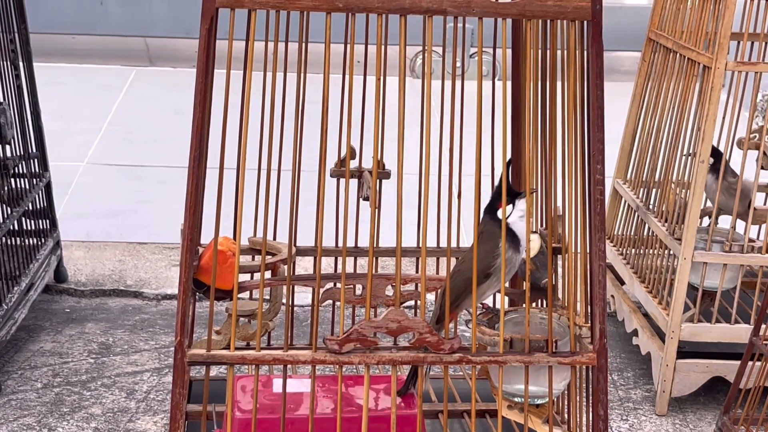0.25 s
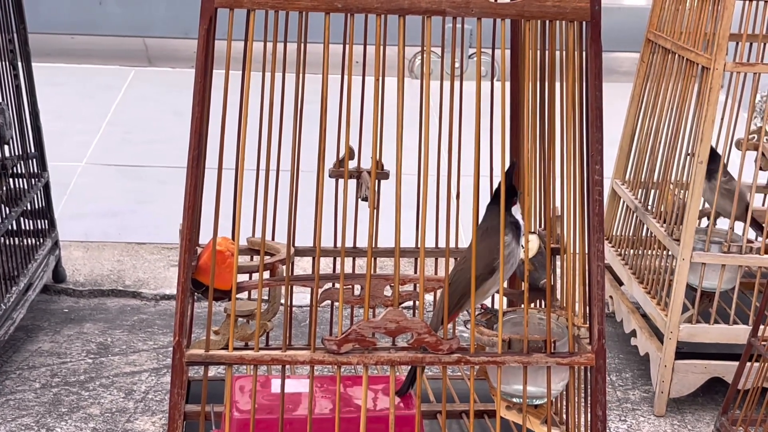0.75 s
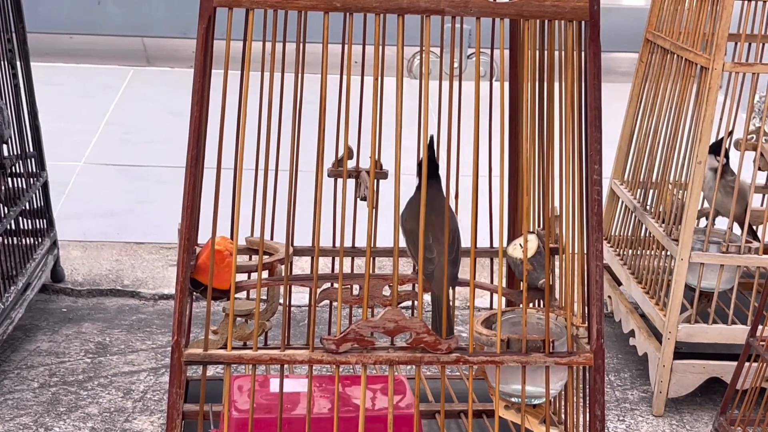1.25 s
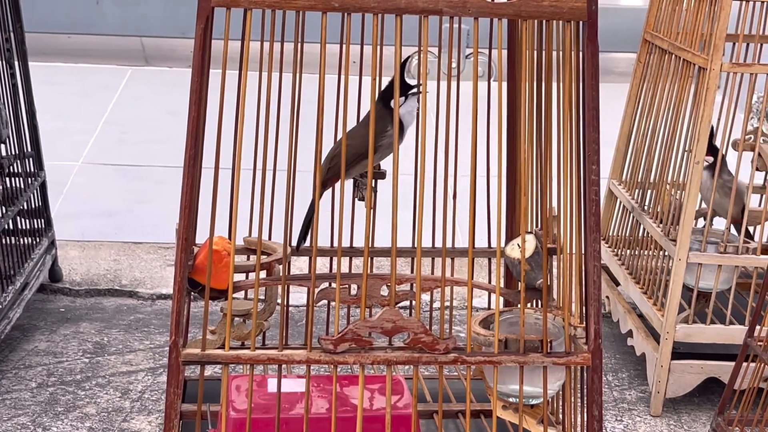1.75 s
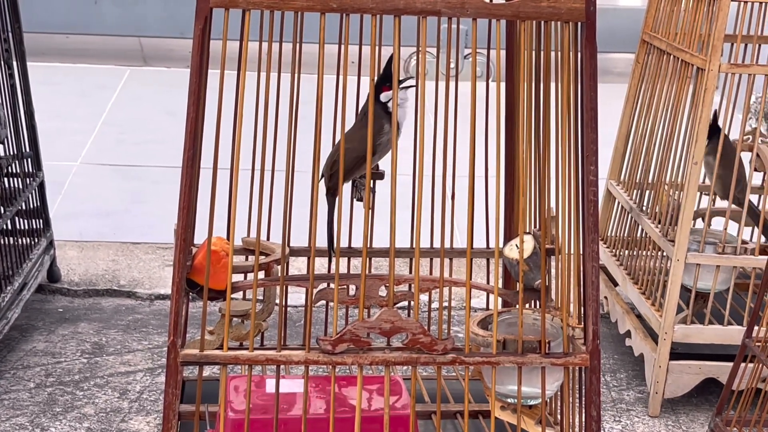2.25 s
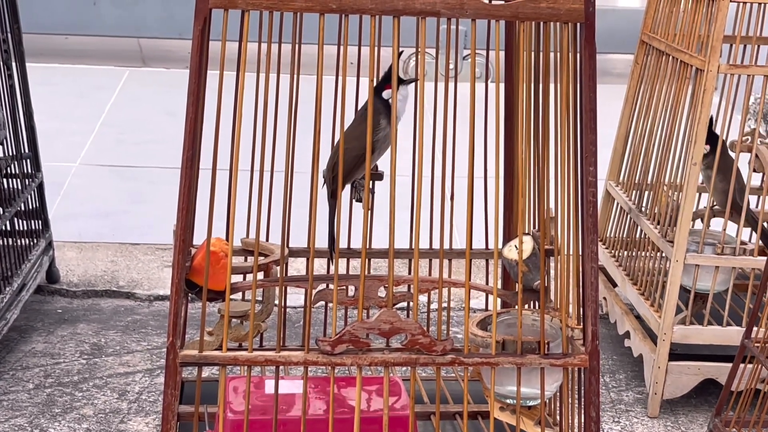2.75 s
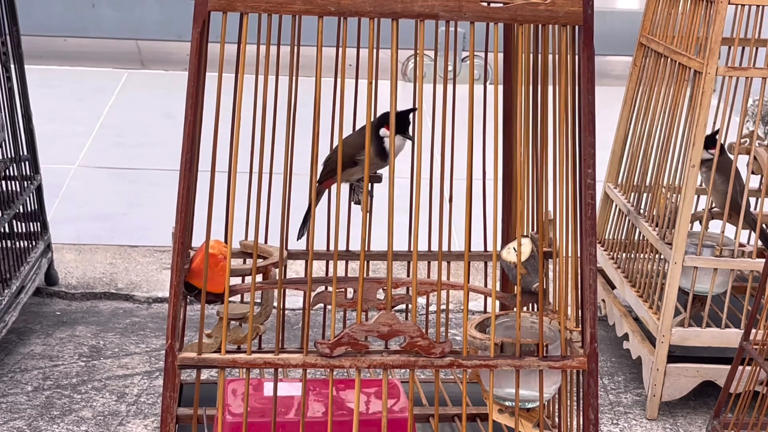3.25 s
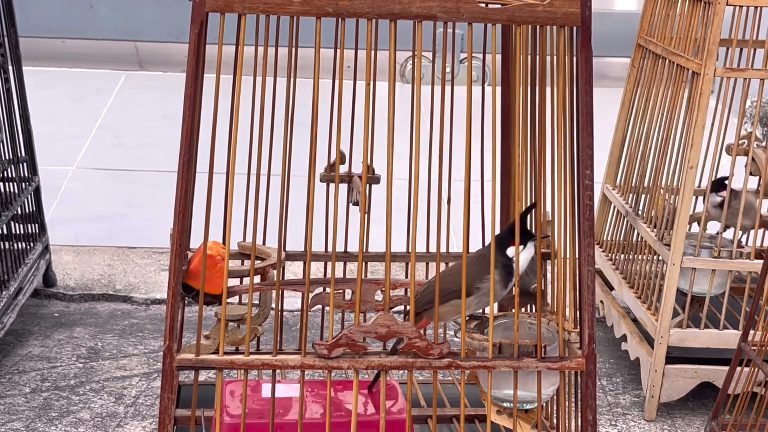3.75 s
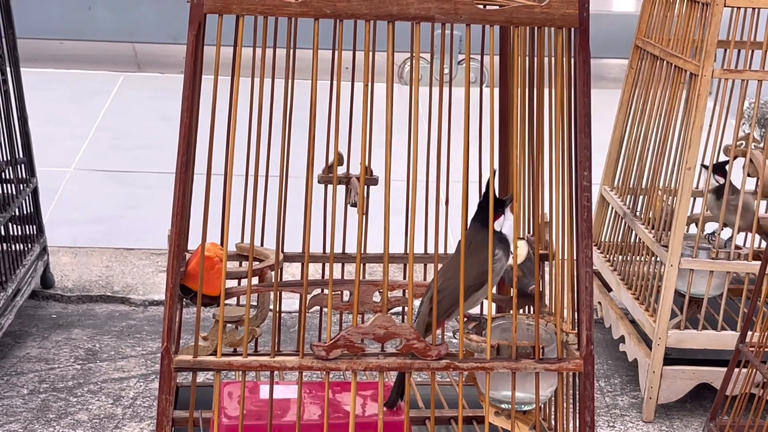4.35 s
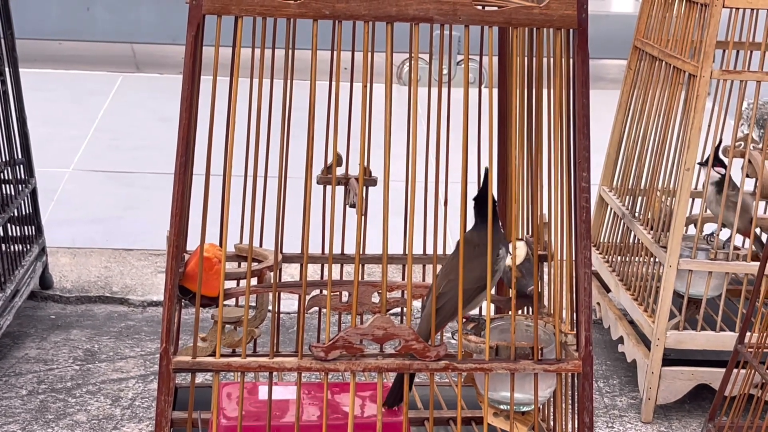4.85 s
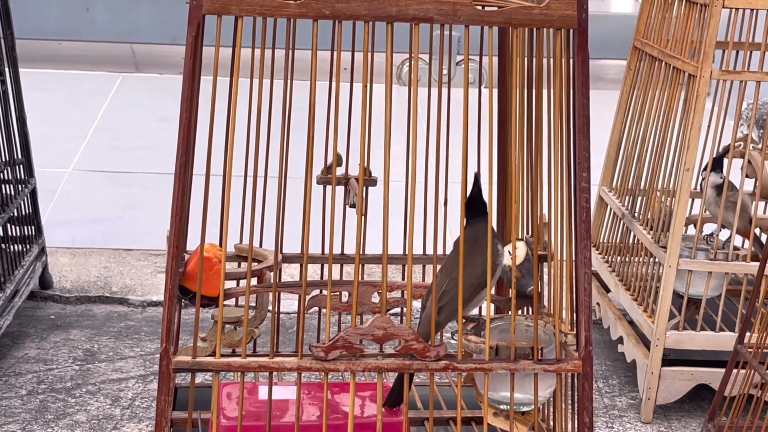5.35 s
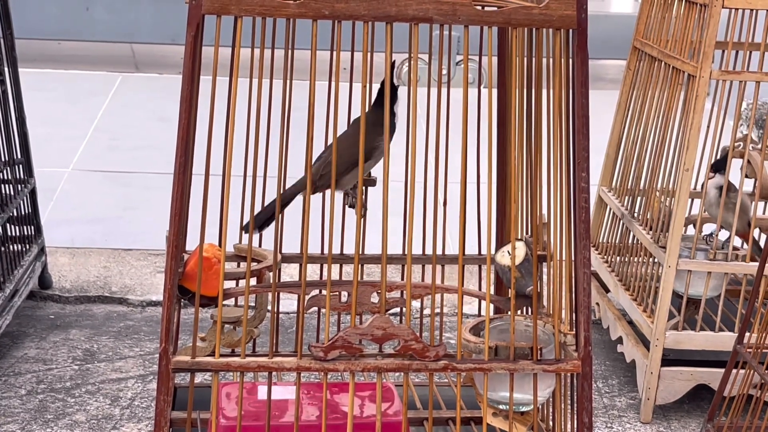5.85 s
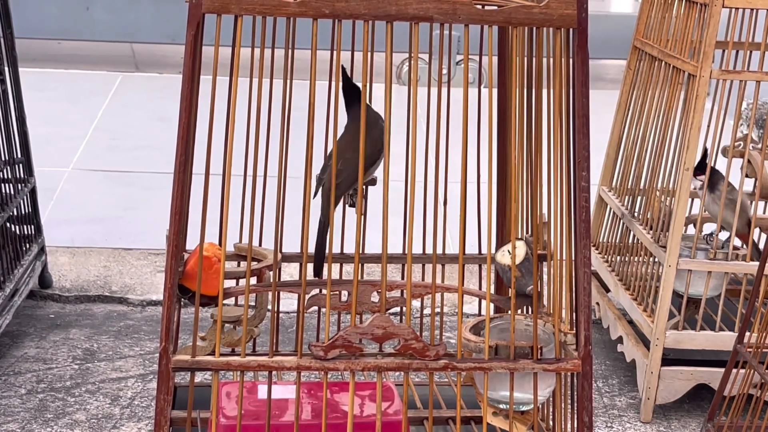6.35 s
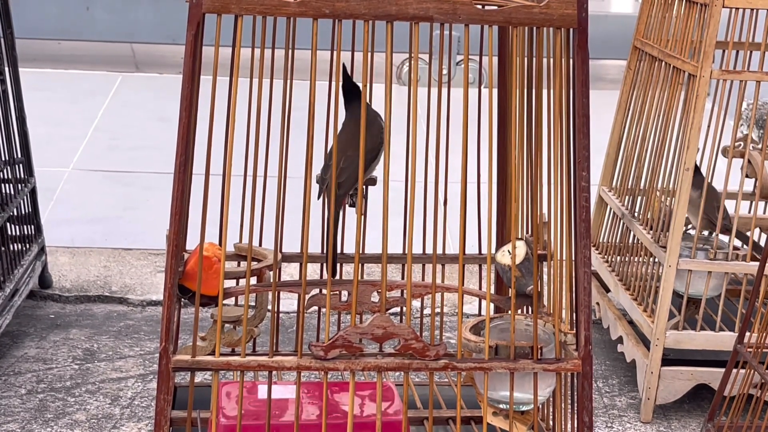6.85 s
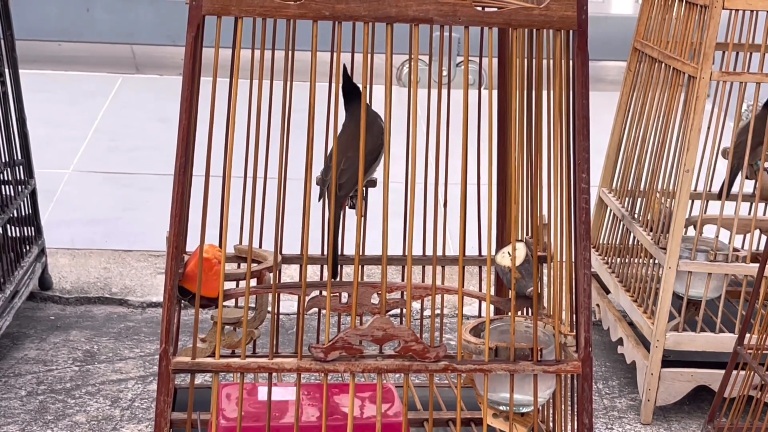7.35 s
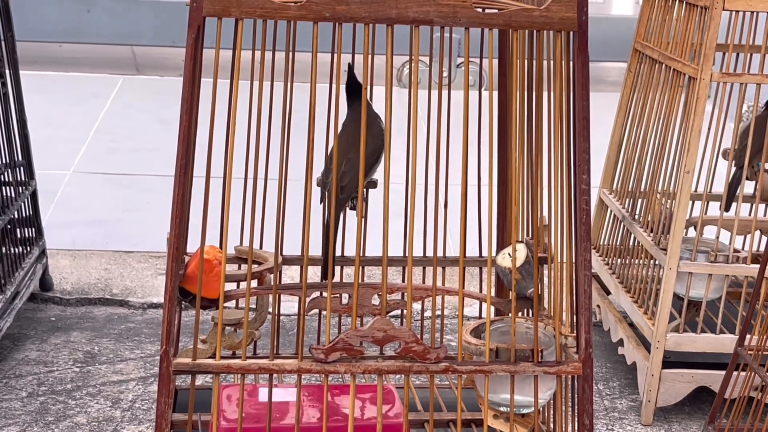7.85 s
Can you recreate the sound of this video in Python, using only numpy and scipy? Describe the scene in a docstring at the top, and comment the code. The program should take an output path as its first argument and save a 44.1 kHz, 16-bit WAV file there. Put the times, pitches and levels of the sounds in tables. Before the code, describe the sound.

Close, clear warbling from a caged songbird gives way to quiet calls and faraway birds, over light wind and handling thumps.

```python
"""A caged bulbul, close by in a paved yard, strings stock syllables into four loud, trilled phrases.
Its syrinx gives a nearly pure tone, the beak beams the overtones; soft nasal chups fall in between.
Other birds twitter or answer from farther off; the cages tick, rustle and once ring.
Wind buffets the microphone at first; later the hand-held camera thumps and rubs over a faint hush."""
import sys
import numpy as np
from scipy import signal
from scipy.fft import rfft, irfft, next_fast_len
from scipy.io import wavfile
from scipy.ndimage import map_coordinates

SR = 44100
rng = np.random.default_rng(int(sys.argv[2]) if len(sys.argv) > 2 else 0)


def transcribe(signal):
    """Save signal, clipped to [-1, 1], as a 16-bit WAV file at the path in sys.argv[1]."""
    frames = np.atleast_2d(signal).T
    limited = np.clip(frames, -1, 1)
    pcm = np.round(limited * 32767).astype(np.int16)
    wavfile.write(sys.argv[1], SR, pcm)


N = 357651
TOP_HZ = 15800

# syllable shapes: t/s, f/Hz, level/dB, trill depth/share of f
BUZZ = [(0, 1519, -39.5, .12), (0.011, 2072, -27, 0.19), (.023, 2423, -16.5, .08),
        (.042, 2535, -14.5, 0.078), (0.064, 2770, -15, 0.19), (0.078, 3288, -18.5, 0.23),
        (.094, 3800, -16, .14), (.112, 3861, -13.5, .12), (.122, 3850, -36, .1)]  # climbs an octave
WARBLE = [(0, 2156, -36, 0.088), (.013, 2052, -25.5, .06), (.026, 1919, -15.5, 0.089),
          (.038, 1958, -19.5, .05), (.044, 2484, -9, 0.092), (.057, 2590, -7.5, .13),
          (.073, 2900, -8.5, .1), (.092, 3049, -7.5, 0.067), (.106, 2993, -36, 0.034)]  # soft low note, then a loud step up
SWEEP = [(0, 1105, -37.5, 0.035), (.012, 2212, -28, .03), (0.02, 2277, -22, 0), (.022, 2810, -10.5, 0.066),
         (0.03, 3412, -26.5, 0.0603), (.044, 3517, -12, .04), (.052, 3570, -14, .01), (0.056, 3733, -18, 0),
         (.064, 3880, -34.5, .02)]  # fast rise, broken halfway
DROP = [(0, 3993, -28.5, 0.0079), (.006, 2634, -20.5, 0.0027), (0.016, 2593, -9, 0.015),
        (.022, 2948, -10, 0.0034), (.028, 2558, -6, 0.017), (.05, 2537, -11, 0.034), (.07, 2600, -11, .06),
        (.078, 2253, -16, 0.02), (.093, 2242, -19, 0)]  # falls onto a held note, sags
TRILL = [(0, 4090, -31, 0), (.006, 2974, -11.5, 0.024), (0.011, 3424, -13, .09), (0.03, 3720, -10.5, .09),
         (0.048, 3847, -9, .05), (.053, 3320, -19, 0), (.062, 1238, -35, 0.034)]  # high, level
SLUR = [(0, 1090, -36.5, 0), (.009, 2010, -19, .03), (.015, 2000, -18.5, .1), (.021, 2387, -8, .02),
        (.036, 2285, -6, .02), (.047, 2250, -32.5, 0)]  # up from the bottom of the voice
FLICK = [(0, 4060, -26, 0.0048), (.004, 2790, -2, 0), (.007, 3400, -11, 0), (0.009, 3580, -48.5, 0)]  # down and up
QUAVER = [(0, 2780, -38.5, .02), (.006, 2720, -9, .015), (.021, 2550, -10.5, 0), (.027, 2600, -8, 0.017),
          (.05, 2671, -8.5, .08), (.06, 2312, -9, 0), (.07, 2270, -7.5, 0.02), (.076, 2250, -31, 0.0028)]  # held, quavers, sags
FLOURISH = [(0, 3300, -37, 0), (.006, 2600, -21, .03), (0.021, 2700, -7.5, .03), (0.028, 2440, -11.5, 0),
            (.046, 2423, -8.5, 0.039), (.058, 2500, -22.5, .1), (.078, 2880, -15, .2),
            (.11, 3830, -20, 0.18), (0.128, 3950, -32.5, 0.12)]  # held, then a climbing buzz
# other side of the syrinx, same columns
LOW_RISE = [(0, 1292, -26, 0.0046), (.008, 1667, -25, 0.025), (.022, 2300, -23, .03), (.03, 2493, -24, 0)]
LOW_FALL = [(0, 2450, -44.5, 0.0029), (.026, 2245, -25, .02), (.046, 2040, -23, .02)]
LOW_END = [(0, 1750, -36, 0), (.008, 1520, -23, .02), (.024, 1725, -24.5, 0.017), (.066, 1765, -24, .01),
           (.096, 1677, -34.5, .01)]  # closes each phrase


def bulbul(hiss_db=-38, splash_db=-17, hiss_beam=0.88):
    """Syllables in a row; thin hiss near 11-12 kHz follows their level, hard trills splash noise."""
    # t/s, shape, level/dB, pitch ratio, length ratio, trill rate/Hz, treble/dB as the head turns
    phrases = [(-.097, WARBLE, -4.5, 1.02, 1.071, 69, -1.5), (0.063, TRILL, -0.5, 1, 1, 66.7, 17.5),
               (.163, SLUR, 1, 1, 1, 79.4, 2), (.213, FLICK, -1.5, 1, 1, 80, 1.5),
               (0.23, QUAVER, -0.5, 1.022, 0.97, 76.1, -6), (.302, LOW_END, 2.5, 1.07, 0.4, 78.3, -2),
               (1.192, BUZZ, -1, 1.037, 1.044, 97.8, -3), (1.487, WARBLE, -1.5, 1.057, 1.06, 68.64, -3),
               (1.649, SWEEP, 5.5, 1.037, 1.0, 80.03, -3.5), (1.793, FLOURISH, 0.5, 1, 1, 89.5, -4.5),
               (1.81, LOW_RISE, -6, 0.95, 1.12, 80.3, -2.5), (1.84, LOW_FALL, 0, 1.02, 1.03, 80, -0.5),
               (1.884, LOW_END, -1.5, 1.046, 0.96, 80.3, 6), (2.046, WARBLE, -1, 1.002, .99, 69.6, 7.5),
               (2.198, SWEEP, 2, 1.011, 1.036, 82.1, 7.5), (2.317, DROP, -1, 1, 1, 75.1, -5.5),
               (2.406, LOW_END, -0.5, 0.99, 0.92, 80, 3), (4.198, BUZZ, 1, .99, .93, 96.03, -3.5),
               (4.255, LOW_FALL, -21, .6, 1, 80, -2), (4.445, WARBLE, 1, 1, 0.95, 69.46, -3),
               (4.598, SWEEP, -0.5, 0.99, 0.94, 81.6, 2.5), (4.716, DROP, 1, 1.012, 0.92, 74.9, -6),
               (4.803, LOW_END, -.5, 1, 1.02, 81.55, -8.5)]
    # noise spectra: f/Hz, level/dB
    hiss_spectrum = [(3500, -48), (5500, -16), (9000, -15.5), (10200, -33), (11000, -7), (12000, -1.5),
                     (12800, -32), (15500, -34.5)]
    splash_spectrum = [(900, -30.5), (1600, -7.5), (3500, -9), (5000, -6.5), (9500, -6.5), (10300, -19.5),
                       (11400, -11.5), (12800, -34.5)]
    tone, hiss_level, splash = np.zeros((3, N))
    for s, shape, db, pitch_ratio, length_ratio, trill_hz, treble_db in phrases:
        sound, level, depth = syllable(shape, pitch_ratio, length_ratio, trill_hz, treble_db)
        hiss_envelope = (amp(db) * level) ** .7
        add(tone, s, amp(db) * sound)
        add(hiss_level, s, amp(hiss_db + hiss_beam * treble_db) * hiss_envelope)
        add(splash, s, amp(splash_db + db) * depth * level)
    return tone + hiss_level * hiss(hiss_spectrum) + splash * hiss(splash_spectrum)


def syllable(shape, pitch_ratio, length_ratio, trill_hz, treble_db, settle_s=.04, edge_s=0.0015):
    """Tone, level and trill depth; each trill beat leaps up pinched and slides down strong."""
    knots_s, *columns = np.transpose(shape)
    n = int(knots_s.max() * length_ratio * SR)
    t = np.arange(n) / SR
    contour_hz, level_db, depth = (np.interp(t, knots_s * length_ratio, c) for c in columns)
    fast_start = 1 + .8 * np.exp(-t / settle_s)
    beat = phase_of(trill_hz * fast_start * (1 + .025 * wobble(90, n)))
    leap = .8 * np.sin(beat) + .25 * np.sin(2 * beat)
    jitter = (0.0029 + .16 * depth) * wobble(500, n)
    pitch_hz = pitch_ratio * contour_hz * (1 + depth * leap + jitter)
    pulse_db = -46 * depth * (np.cos(beat) + 0.37) + .8 * wobble(150, n)
    membrane_flutter = np.sin(phase_of(310 * (1 + .15 * wobble(90, n))))
    burr = 1 + np.clip(4.5 * depth, 0, .3) * membrane_flutter
    gate = np.clip(np.minimum(t, t[-1] - t) / edge_s, 0, 1)  # syrinx opens and shuts
    level = amp(level_db + pulse_db) * gate
    return level * burr * syrinx(pitch_hz, treble_db), level, depth


def syrinx(pitch_hz, beam_db, full_beam_hz=11000, unsteady_db=4):
    """Nearly pure tone with faint, unsteady overtones; the beak beams the highest most."""
    overtones = [(3000, -26.5), (4800, -38), (6500, -41), (8200, -34), (10200, -35), (11100, -17.5),
                 (12000, -34.5), (12800, -58), (15500, -57.5)]  # f/Hz, level/dB re fundamental
    phase = phase_of(pitch_hz)
    tone = np.sin(phase)
    for k in range(2, 7):
        hz = k * pitch_hz
        beamed_db = beam_db * np.minimum(hz / full_beam_hz, 1) ** 2
        db = along(overtones, hz) + beamed_db + unsteady_db * wobble(140, len(hz))
        tone += amp(db) * (hz < TOP_HZ) * np.sin(k * phase)
    return np.sqrt(2) * tone


def chups(arch_depth=0.28, hoarse_db=-9, shake=0.049):
    """Short nasal calls: an arch of pitch, rich in overtones, broken up and a little hoarse."""
    calls = [(0.4625, -31, 0.024, 1480), (0.6157, -41, 0.04, 1375), (0.727, -39.5, 0.044, 1217),
             (0.81, -40, 0.042, 1258), (1.154, -36, 0.068, 1457), (1.3913, -34, 0.05, 1326),
             (1.461, -25.5, 0.046, 1411), (2.6065, -33.5, 0.07, 1378), (2.895, -36.5, 0.056, 1706),
             (3.009, -38, 0.068, 1313), (3.166, -36, 0.029, 1636), (3.393, -34.5, 0.042, 1550),
             (3.5547, -24, 0.043, 1429), (3.76, -36, 0.027, 1606), (3.88, -35, 0.052, 1592),
             (6.035, -39.5, 0.046, 1497), (6.1356, -27.5, 0.035, 1405), (6.2353, -35, 0.065, 1685),
             (6.405, -39, 0.032, 1460), (6.596, -39.5, 0.065, 1587), (7.2405, -45, 0.038, 1564),
             (7.3644, -47.5, 0.067, 1450), (7.7303, -33.5, 0.056, 1718), (8.0835, -29, 0.046, 1492)]  # t/s, level/dB, length/s, mean f/Hz
    spectrum = [(1000, 0.5), (1600, 3.5), (3200, 2), (4800, -10), (7000, -18.5), (10000, -20), (11500, -23),
                (13500, -38.5)]  # f/Hz, level/dB
    out = np.zeros(N)
    rasp = amp(hoarse_db) * hiss([(500, -42.5)] + list(spectrum))
    for s, db, length_s, mean_hz in calls:
        u = np.linspace(0, 1, int(length_s * SR))
        span = (int(s * SR) + np.arange(len(u))) % N
        arch = np.sin(np.pi * u)
        hz = mean_hz * (1 + arch_depth * (arch - 2 / np.pi) + shake * wobble(330, len(u)))
        voice = sum(amp(along(spectrum, k * hz)) * np.sin(k * phase_of(hz)) for k in range(1, 9))
        level = amp(db - 11.5 + 4 * wobble(211, len(u))) * arch
        add(out, s, level * (voice + rasp[span]))
    return out


def twitter():
    """A neighbouring bird's quick run of notes."""
    notes = [(.925, 0.011, 1890, 2600, -34.5, 0.022), (.942, 0.013, 1840, 2610, -31, 0.097),
             (.959, 0.015, 1830, 2540, -32.5, 0.031), (.976, 0.019, 1810, 2530, -31, 0.084),
             (.99, 0.049, 2154, 1793, -36, 0.13), (1.032, 0.026, 3110, 3820, -45, 0.095)]  # t/s, length/s, start f/Hz, end f/Hz, level/dB, trill depth
    return glides(notes)


def far_birds():
    """One bird repeats a three-note phrase; others throw in single notes, and one falling whistle near 2.47 s
    carries a strong overtone an octave up."""
    # t/s, length/s, start f/Hz, end f/Hz, level/dB, trill depth
    phrase = [(0, .055, 2070, 2110, -55.5, 0.0091), (0.04, .07, 3310, 3557, -51, .09),
              (0.164, .05, 3103, 3056, -44, .008)]
    single_notes = [(2.473, 0.088, 3230, 2655, -44.5, 0.02), (2.44, .13, 6900, 5380, -52, 0.015),
                    (3.184, 0.078, 3330, 3510, -45, 0.062), (3.309, 0.075, 2310, 2436, -49, 0.036),
                    (3.42, 0.042, 2547, 2497, -42.5, 0.017), (3.61, 0.056, 3130, 3080, -46.5, 0.072),
                    (4.13, 0.082, 2640, 2670, -53, .063), (5.841, .094, 3580, 3330, -51, 0.078),
                    (6.06, 0.096, 2580, 2550, -51.5, 0.051), (7.62, 0.091, 2910, 3090, -48, 0.086),
                    (7.669, 0.078, 3940, 3850, -51, 0.0075)]
    repeats = [(2.83, 3), (3.849, 0.5), (4.965, 0.5), (7.89, 3.5)]  # t/s, level/dB
    repeated = [(s + after_s, length_s, start_hz, end_hz, db + note_db, depth)
                for s, db in repeats for after_s, length_s, start_hz, end_hz, note_db, depth in phrase]
    return glides(repeated + single_notes)


def glides(notes, trill_hz=100):
    """Short gliding whistles, some trilled."""
    out, waver = np.zeros(N), wobble(270)
    for s, length_s, start_hz, end_hz, db, depth in notes:
        u = np.linspace(0, 1, int(length_s * SR))
        drift = waver[(int(s * SR) + np.arange(len(u))) % N]
        trill = depth * np.sin(phase_of(trill_hz * (1 + .3 * drift)))
        glide_hz = start_hz + (end_hz - start_hz) * u
        phase = phase_of(glide_hz * (1 + trill + (0.0025 + 0.3 * depth) * drift))
        tone = np.sin(phase) + amp(-25) * np.sin(2 * phase)
        add(out, s, amp(db + 3.5) * np.sin(np.pi * u) * tone)
    return out


def cage_ticks(crack_t60_s=0.017):
    """Claws and beaks on the cages: a tiny crack and one thin ring per touch."""
    touches = [(0.7523, -34, 5720, 0.082), (3.027, -29.5, 4710, 0.0088), (3.6717, -33.5, 12240, 0.037),
               (3.674, -42.5, 7800, 0.083), (5.3288, -41.5, 6670, 0.018), (5.681, -43, 6170, 0.037),
               (6.325, -48.5, 9080, 0.052), (6.7481, -35.5, 4140, 0.085)]  # t/s, level/dB, f/Hz, t60/s
    response = [(1500, -26.5), (4500, -4.5), (12000, 15.0), (13500, -40.5)]  # f/Hz, gain/dB
    out, t = np.zeros(N), np.arange(SR // 4) / SR
    for s, db, hz, t60_s in touches:
        crack = 0.19 * rng.standard_normal(len(t)) * amp(-60 * t / crack_t60_s)
        ring = 0.55 * np.sin(2 * np.pi * hz * t) * amp(-60 * t / t60_s)
        add(out, s, amp(db) * (crack + ring))
    return shaped(out, response)


def cage_ring(hop_s=3.5, gain_db=11, t60_s=1.6):
    """The cage's metal fittings ring as the bird hops down."""
    modes = [(4398, -73), (4554, -73), (5523, -73.5)]  # f/Hz, level/dB
    out, t = np.zeros(N), np.arange(SR) / SR
    ring = sum(amp(db) * np.sin(2 * np.pi * hz * t + .8 * wobble(40, SR)) for hz, db in modes)
    add(out, hop_s, ring * amp(gain_db - 60 * t / t60_s))
    return out


def handling(rise_s=0.0035, rest_db=-59, tap_hz=342, tap_count=170):
    """Dull bumps, small taps and the lumpy rub of fingers on the camera, deep bass removed; the bump at 3.48 s
    is the bird landing in its cage."""
    thumps = [(2.282, -24, 226.6), (2.303, -26, 313), (3.059, -31, 186), (3.222, -28.5, 252),
              (3.484, -30, 355), (3.511, -27.5, 494), (3.554, -29, 543.6), (3.916, -32.5, 293),
              (4.146, -26.5, 314), (4.344, -23, 400), (4.497, -23.5, 277.6), (4.964, -29, 226),
              (4.997, -31.5, 346), (5.09, -21, 230.1), (5.25, -28.5, 334), (6.075, -29, 210.6),
              (6.229, -32.5, 264), (6.678, -27.5, 191.6), (6.933, -27, 262), (6.97, -30.5, 440),
              (7.029, -34.5, 425), (7.19, -34, 444), (7.757, -26, 388)]  # t/s, level/dB, f/Hz
    finger_shifts = [(2.3, .08, -43), (3.25, .18, -49), (3.5, 0.095, -35.5), (4.28, .09, -37.5),
                     (4.56, 0.074, -47.5), (5.02, 0.037, -38.5), (5.23, 0.13, -44.5), (6.15, 0.15, -54),
                     (6.72, 0.113, -49), (6.98, .07, -37.5), (7.28, 0.0443, -58.5), (7.77, 0.038, -39),
                     (7.89, 0.029, -44.5), (8.1, 0.12, -42.5)]  # t/s, half length/s, level/dB
    rub_spectrum = [(47, -70), (80, -41.5), (122, -18), (173, 2), (270, 4), (359, 2.5), (642, -12),
                    (836, -19.5), (1000, -25.5), (1300, -61), (2200, -120)]  # f/Hz, level/dB
    low_cut = [(60, -49), (110, -13.5), (170, -0.5), (600, 2.5), (1100, 4.5)]  # f/Hz, gain/dB
    bumps, t = np.zeros(N), np.arange(SR // 10) / SR
    grip = amp(rest_db) + swells(finger_shifts)
    push = (t / rise_s) ** 2 * np.exp(2 - 2 * t / rise_s)
    for s, db, hz in thumps:
        add(bumps, s, amp(db) * push * np.sin(2 * np.pi * hz * t))
    for at, (size, detune) in zip(rng.integers(0, N, tap_count), rng.standard_normal((tap_count, 2))):
        tap = push * np.sin(2 * np.pi * tap_hz * np.exp(.3 * detune) * t)
        add(bumps, at / SR, grip[at] * amp(-0.5 + 3 * size) * tap)
    rub = amp(-2) * grip * unit(stereo_noise(rub_spectrum) * amp(4 * wobble(45)))
    return shaped(bumps + rub, low_cut)


def wind(rumble_db=-40, rumble_cut_s=1.9, fade_s=0.19, flutter_db=-1.5):
    """Low wind rumble and gusts at the microphone, cut off near 1.9 s; a few puffs follow."""
    gusts = [(1.345, .016, -25), (1.412, .032, -16), (1.57, .03, -34), (1.73, .08, -28),
             (2.21, .033, -40.5), (3.51, .045, -61), (4.5, .012, -59), (5.036, .019, -38)]  # t/s, half length/s, level/dB
    spectrum = [(13, -50.5), (22, -22.5), (44, -6), (66, -1), (134, -7), (207, -18), (240, -17.5),
                (365, -26), (516, -45.5), (700, -38.5), (910, -70.5), (1540, -120)]  # f/Hz, level/dB
    fade = np.clip((rumble_cut_s - np.arange(N) / SR) / fade_s, 0, 1)
    rumble = fade * amp(rumble_db + flutter_db * wobble(34))
    return (rumble + swells(gusts)) * stereo_noise(spectrum)


def rustling():
    """Soft swells of noise among the cages."""
    rustles = [(2.65, 0.038, -41), (4.392, .012, -42), (3.75, 0.39, -55.5), (7.95, 0.32, -59.5)]  # t/s, half length/s, level/dB
    spectrum = [(1000, -28), (2500, 1), (6000, -7.5), (9500, -6), (10200, -27), (11400, 0.5),
                (13000, -29.5)]  # f/Hz, level/dB
    return swells(rustles) * stereo_noise(spectrum)


def hush(low_cut_hz=150):
    """Faint, nearly steady outdoor noise."""
    spectrum = [(65, -36.5), (110, -6), (229, -0.5), (279, -3), (441, -5.5), (937, -8.5), (1370, -13),
                (1480, -13.5), (2110, -15), (2290, -12), (2580, -18.5), (8650, -23.5), (10100, -30.5),
                (11200, -21.5), (12600, -36), (16400, -59.5), (22000, -120)]  # f/Hz, level/dB
    level = amp(-51.5 + 0.48 * wobble(2.2))
    return level * filtered(stereo_noise(spectrum), lambda hz: 1 - 1 / (1 + (hz / low_cut_hz) ** 6))


def nearby(x):
    """Direct sound and first reflections, slightly out of step at the two microphone ports."""
    walls = [(.0027, -20.5), (.0062, -11), (0.0145, -15.5), (.047, -25), (.068, -35)]  # ground, house front, far walls: delay/s, level/dB
    left_lead = [(0, 0), (1210, 0.5), (1810, 0.27), (3010, 0.63), (4050, 0.5), (4650, 0.5), (7150, -2.5),
                 (8010, 1.16), (8870, -0.56), (9390, -1), (10300, -3.5), (11800, -5.5), (12300, -6)]  # f/Hz, phase/rad
    bounces = lambda hz: 1 + sum(amp(db) * np.exp(-2j * np.pi * hz * delay_s) for delay_s, db in walls)
    ports = lambda hz: np.exp(.5j * along(left_lead, hz) * np.array([[1], [-1]]))
    return filtered(x, lambda hz: bounces(hz) * ports(hz))


def yard_echo(x, build_s=0.036):
    """Diffuse echo; the treble dies first."""
    decay_times = [(300, 0.95), (2000, 0.75), (3500, 0.68), (6000, .45), (12000, 0.12)]  # f/Hz, t60/s
    hz, t, noise = signal.stft(rng.standard_normal((2, SR)), SR, nperseg=256)
    envelope = amp(-60 * t / along(decay_times, hz)[:, None]) * (1 - np.exp(-t / build_s))
    mid, side = signal.istft(noise * envelope, SR, nperseg=256)[1]
    tail = np.array([mid + .35 * side, mid - .35 * side])
    return signal.fftconvolve(x[None], tail / np.linalg.norm(tail[0]), axes=1)[:, :N]


def stereo_noise(spectrum):
    """Noise of rms 1, nearly mono in the bass."""
    coherence = [(100, 0.96), (250, .85), (600, 0.32), (1500, 0.63), (4000, 1), (10000, 0.78)]  # f/Hz, left-right correlation
    angle = lambda hz: np.arccos(along(coherence, hz)) / 2
    response = lambda hz: amp(along(spectrum, hz)) * [np.cos(angle(hz)), np.sin(angle(hz))]
    mid, side = filtered(rng.standard_normal((2, N)), response)
    return unit(np.array([mid + side, mid - side]))


def hiss(spectrum):
    """Mono noise of rms 1."""
    return unit(shaped(rng.standard_normal(N), spectrum))


def swells(rows):
    """One bell-shaped rise of level per row."""
    t = np.arange(N) / SR
    return sum(amp(db) * np.exp(-((t - s) / half_s) ** 2) for s, half_s, db in rows)


def wobble(rate_hz, size=N):
    """Smooth random curve."""
    knots = rng.standard_normal(int(size * rate_hz / SR) + 4)
    return map_coordinates(knots, [np.arange(size) * rate_hz / SR])


def filtered(x, response):
    """Apply a complex frequency response."""
    m = next_fast_len(N + SR // 2)
    return irfft(rfft(x, m) * response(np.fft.rfftfreq(m, 1 / SR)), m)[..., :N]


def shaped(x, points):
    """Filter by (f/Hz, gain/dB) points."""
    return filtered(x, lambda hz: amp(along(points, hz)))


def along(points, hz):
    """Interpolate (f/Hz, value) points on a log axis."""
    f, values = np.transpose(points)
    return np.interp(np.log(hz + 1), np.log(f + 1), values)


def add(track, s, sound):
    """Mix a sound in at time s."""
    start = round(s * SR)
    sound = sound[max(-start, 0):]
    part = track[max(start, 0):][:len(sound)]
    part += sound[:len(part)]


def phase_of(hz):
    """Running phase/rad."""
    return 2 * np.pi * np.cumsum(hz) / SR


def amp(db):
    """dB to gain."""
    return 10 ** (np.asarray(db) / 20)


def unit(x):
    """Scale to rms 1."""
    return x / np.sqrt(np.mean(x ** 2) + 1e-20)


def scene():
    """The singer is close and dry; the far birds carry the most echo."""
    song = bulbul()
    small_sounds = chups() + twitter() + cage_ticks() + cage_ring()
    far = far_birds()
    echo = yard_echo(amp(-28) * song + amp(-17) * small_sounds + amp(-7) * far)
    birds = nearby(song + small_sounds) + amp(2) * far + echo
    return birds + hush() + rustling() + handling() + wind()


def record(dry):
    """Soft clip at full scale, then the band limit."""
    rounded = dry / (1 + np.abs(dry) ** 12) ** (1 / 12)
    return filtered(rounded, lambda hz: hz < TOP_HZ)


dry = scene()
out = record(dry)
transcribe(out)
```